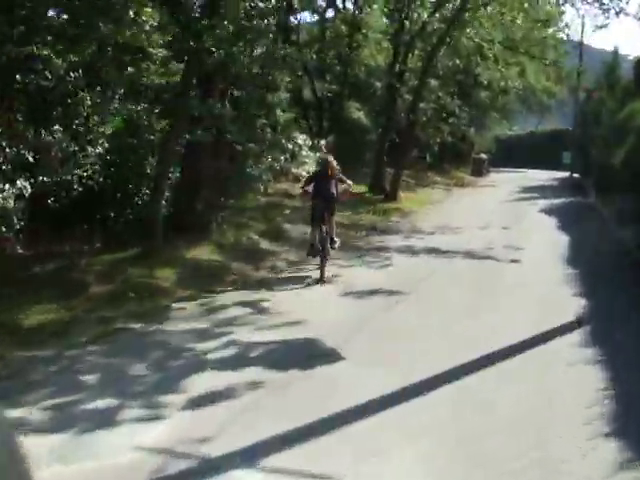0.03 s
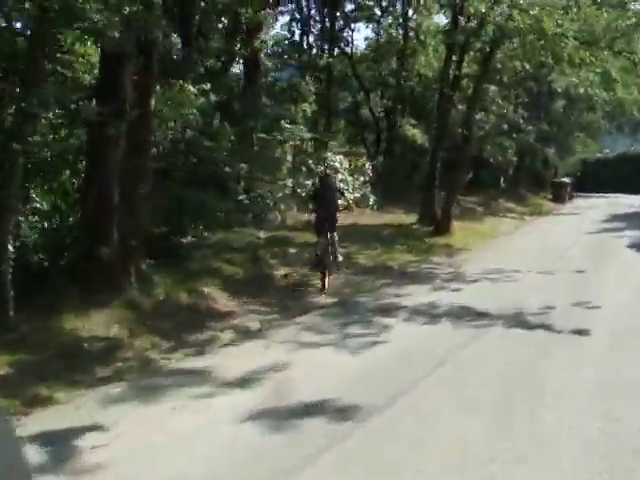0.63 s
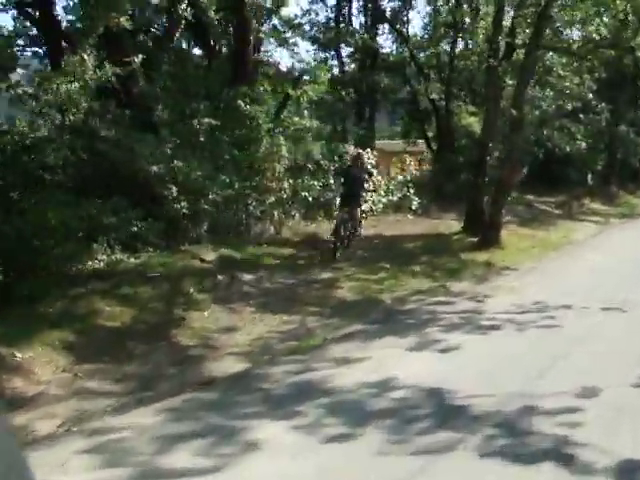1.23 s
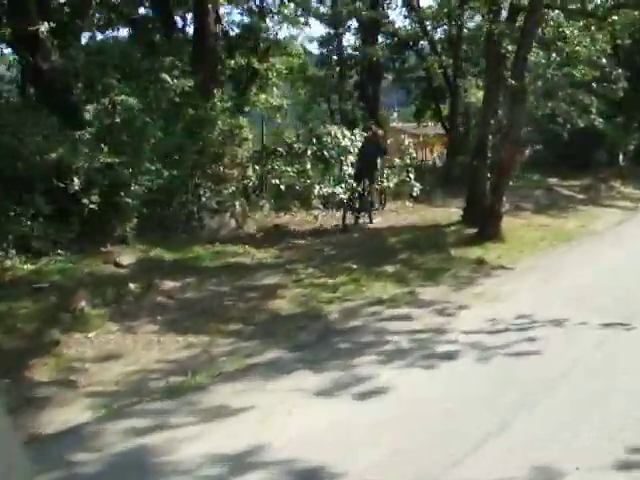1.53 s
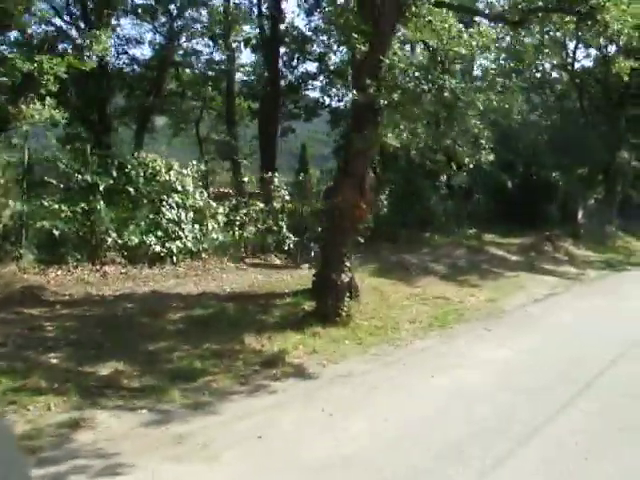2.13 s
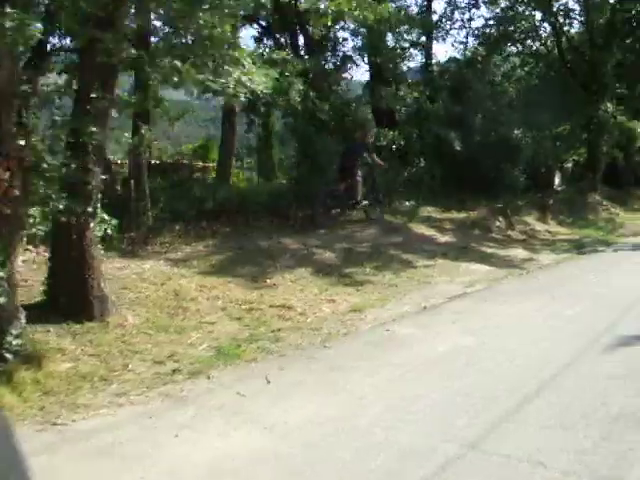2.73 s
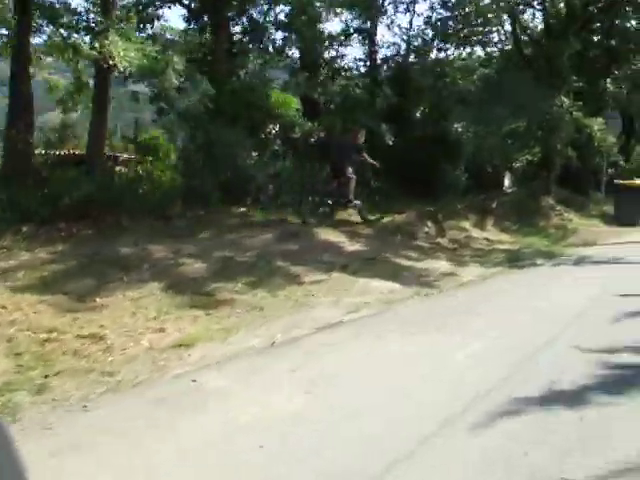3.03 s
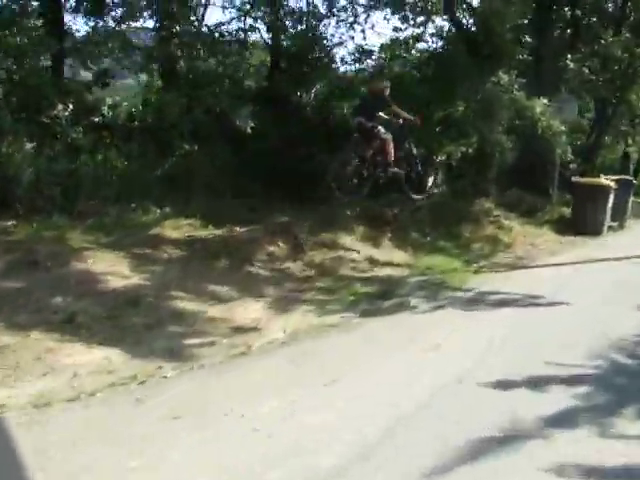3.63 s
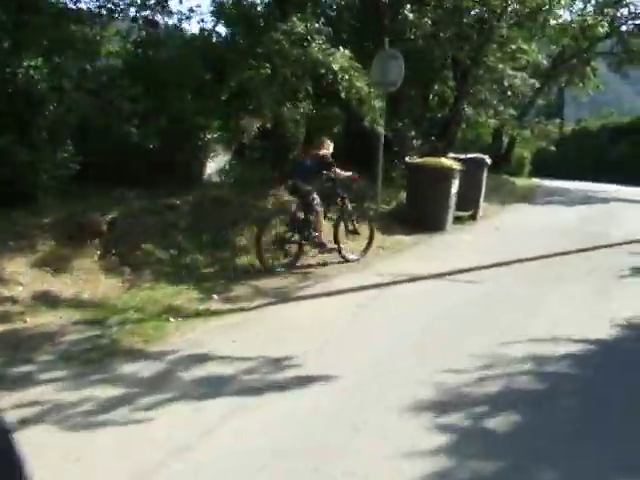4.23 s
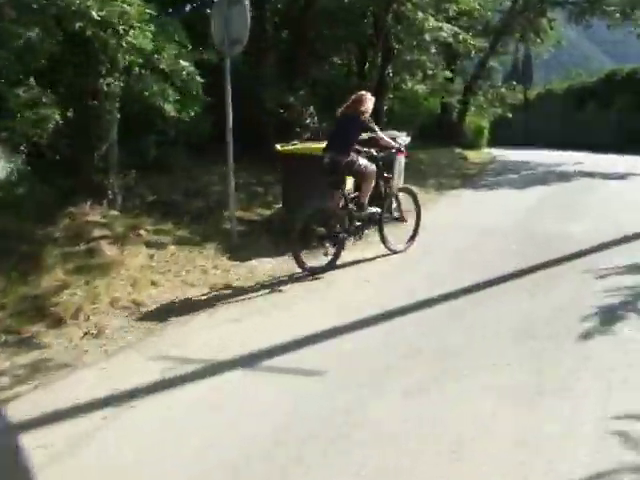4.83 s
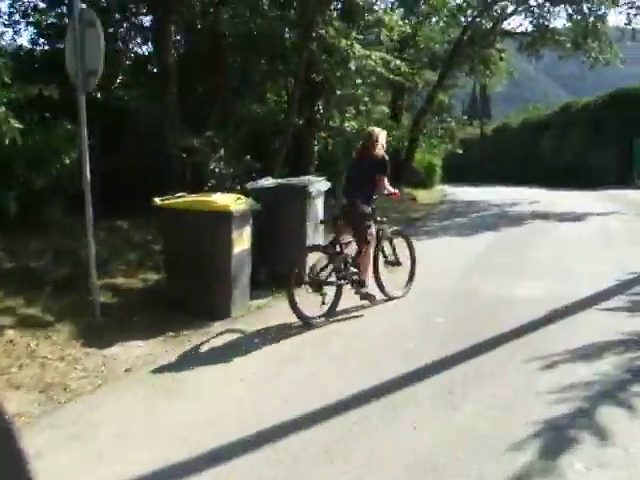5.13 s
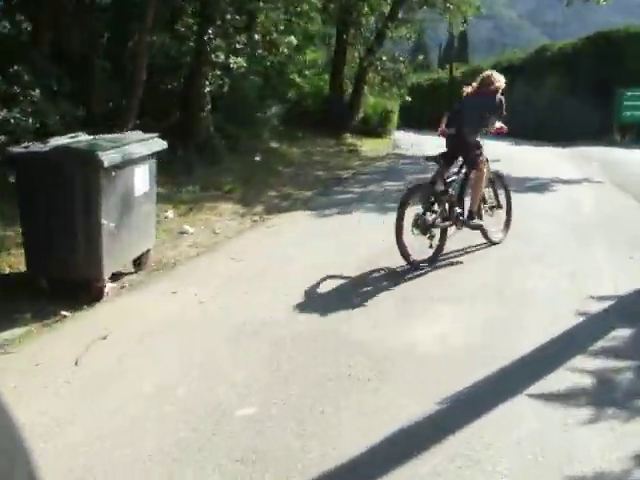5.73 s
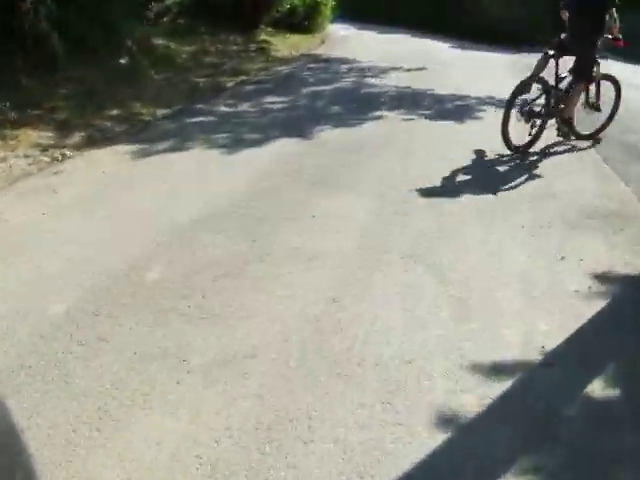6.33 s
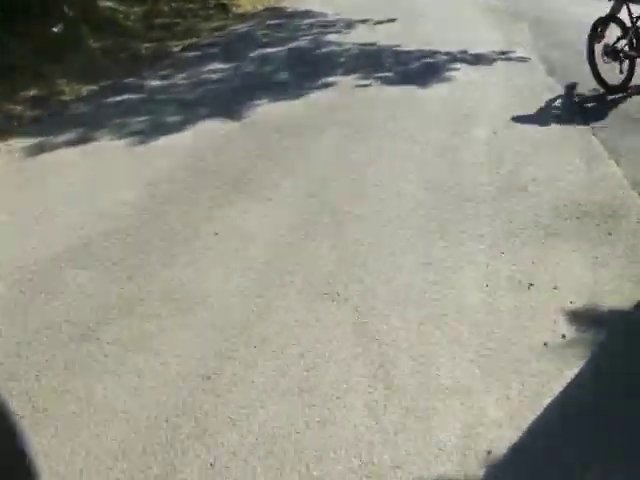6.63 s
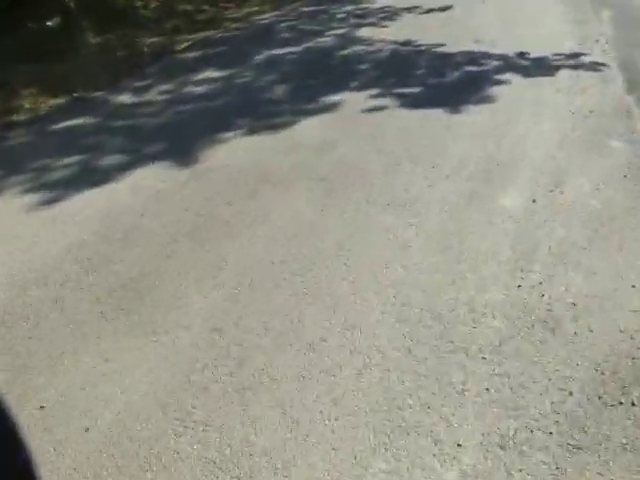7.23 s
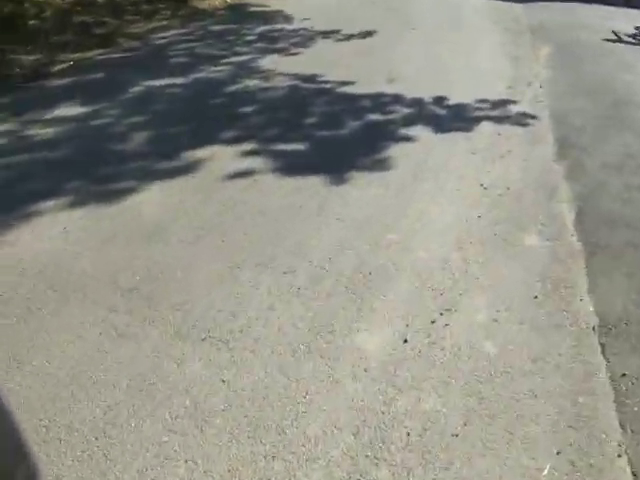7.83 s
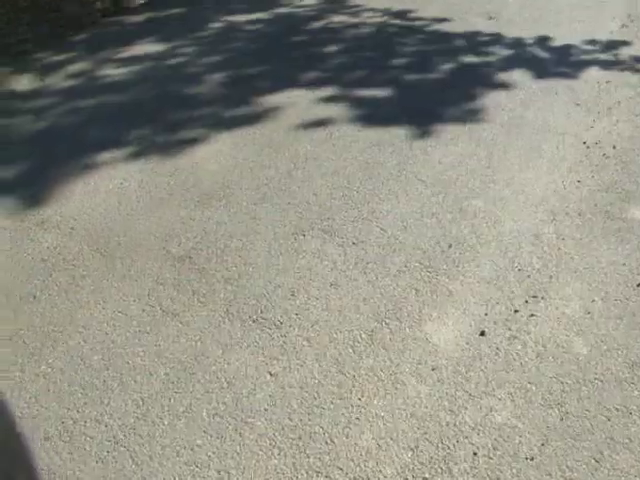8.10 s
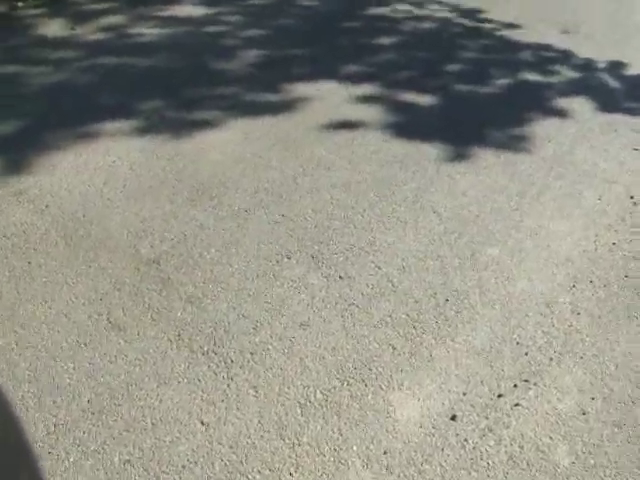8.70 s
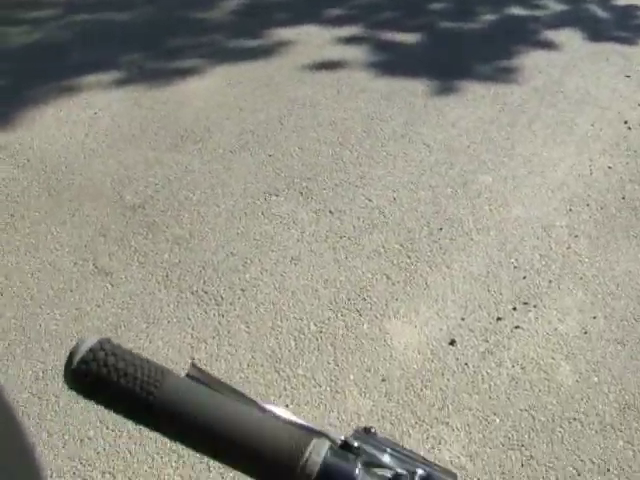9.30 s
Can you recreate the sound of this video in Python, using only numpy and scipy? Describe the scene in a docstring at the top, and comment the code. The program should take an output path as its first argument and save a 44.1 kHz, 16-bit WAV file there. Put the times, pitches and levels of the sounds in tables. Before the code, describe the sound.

Close wind buffets a microphone on a moving bicycle from the start, a loud, uneven low rumble with gusts and short slaps. Faint crunches of dry grass come from a bike ahead at about 0.5 seconds, and a small knock just after 1 second. The wind is strongest from about 2 to 4.6 seconds. Around 4 seconds the other bike lands a jump with a brief crunch and a rattle of sharp clicks. The wind eases, gives a few last puffs near 6 seconds and has died away by 6.6, leaving a quiet, steady hiss of road and foliage with faint grit under the tyres. A dull knock and light rattles come near 8 seconds. From about 8.5 to 9 seconds a braked tyre scrapes over grit, with sharp clicks and a spray of sand. Two sharp ticks follow at about 9.2 and 9.4 seconds.

```python
"""Following a bike past a dirt bank

Roadside, with the microphone on a bicycle behind a second rider who jumps a dirt bank.
Close up, wind buffets the microphone and dies away as the bike slows, leaving a steady hiss of
road and foliage. Ahead, the other bike lands in dry grass and leaves with a crunch and a rattle.
Later a braked tyre scrapes over grit, and two sharp ticks follow."""
import sys
import numpy as np
from scipy import signal
from scipy.fft import rfft, irfft
from scipy.io import wavfile
from scipy.ndimage import uniform_filter1d

SR = 44100
rng = np.random.default_rng(int(sys.argv[2]) if len(sys.argv) > 2 else 0)


def generate_wav(signal):
    """Clip the signal to [-1, 1] and save it as 16-bit WAV at the path in sys.argv[1]."""
    frames = np.transpose(np.atleast_2d(signal))
    scaled = np.clip(frames, -1, 1) * 32767
    pcm = np.round(scaled).astype(np.int16)
    wavfile.write(sys.argv[1], SR, pcm)


N = 417186

# Airflow on the microphone, dying away as the bike slows: time_s, rumble_db, eddy_db
AIRFLOW = [(0, -22, -35.5), (.4, -20.5, -30.5), (1.05, -18, -29), (1.55, -17, -30), (2.3, -17, -24.5),
           (2.9, -16.5, -27.5), (3.6, -19, -32.5), (4.05, -21, -33), (4.35, -19.5, -30),
           (4.92, -26.5, -38.5), (5.15, -23, -34), (5.55, -25.5, -32), (6.2, -33, -47.5), (6.6, -44, -50.5),
           (7.35, -51.5, -56), (7.9, -47.5, -52.5), (8.38, -56.5, -54), (9.46, -58.5, -54)]
# Lulls and puffs in that airflow: middle_s, length_s, rumble_change_db, eddy_change_db
LULLS_AND_PUFFS = [(0.204, 0.12, -7.5, -7.5), (.3, 0.11, -3, 4), (0.724, .05, -1.5, -8),
                   (0.927, 0.12, -0.5, 4.5), (1.06, 0.16, 1.5, 2.5), (1.16, 0.045, -5.5, -6),
                   (2.177, .09, -1, 4), (2.724, 0.063, -1.5, -9), (2.901, 0.045, -2, -8),
                   (3.099, 0.049, -3, -10), (3.177, 0.044, -8, -6), (3.915, 0.074, 2.5, 5),
                   (3.96, .05, 1, -11), (4.467, 0.06, -4.5, -12), (4.538, .04, -2, -7),
                   (4.6, .09, 0.5, 7.5), (4.832, .1, -4, 0), (5.342, 0.093, -5, -9),
                   (5.768, .11, -5.5, -10), (5.847, .07, 5, 4.5), (5.987, 0.095, -11, -8),
                   (6.074, .08, 8.5, 8.5), (6.85, .16, 5, 6), (7.743, 0.37, 5.5, 2), (8.747, 0.39, 13, 2)]
# The largest eddies passing the microphone: middle_s, length_s, level_db
SURGES = [(.29, 0.12, -22), (.6, 0.089, -23), (.93, 0.1, -21.5), (2.47, .07, -24), (2.71, 0.079, -22),
          (2.93, .12, -25), (3.18, 0.12, -19), (3.36, 0.15, -16), (4.34, 0.33, -18.5), (4.53, 0.21, -17.5),
          (5.64, 0.13, -20), (6.03, 0.13, -32), (8.62, .14, -46), (8.82, .12, -46)]
# Wind spectra, from the largest eddies to the smallest: frequency_hz, density_db
SWAY_SPECTRUM = [(12, -20.5), (22, -6), (45, -2.5), (75, -3.5), (110, -15.5), (200, -27.5)]
RUMBLE_SPECTRUM = [(55, -7.5), (90, 2.5), (135, 2.5), (190, -1), (260, -4), (340, -9.5), (480, -16.5),
                   (700, -25.5)]
EDDY_SPECTRUM = [(100, -24.5), (220, -5), (400, -2.5), (700, -7), (1100, -13.5), (1700, -24), (2600, -36.5),
                 (4500, -47)]
FIZZ_SPECTRUM = [(600, -16), (1200, -0.5), (1650, -3), (2200, -7), (3200, -17.5), (5000, -21),
                 (8000, -27.5)]

# Background hiss of road and foliage: frequency_hz, density_db
HISS_SPECTRUM = [(160, -36.5), (280, -5.5), (328, -5), (368, 0), (418, -5.5), (634, -9), (797, -1.5),
                 (1020, -8), (1260, -6), (1730, -7.5), (2400, -5.5), (3490, -11.5), (5840, -7),
                 (7350, -10.5), (8600, -18), (11200, -49.5), (18900, -120)]
# Set curve for the hiss, ducked as by a recorder's gain control in loud wind: time_s, level_db
HISS_LEVEL = [(0, -46.5), (1.6, -47), (2.2, -53), (4.45, -51.5), (5.0, -47), (6.1, -43.5), (7.3, -43),
              (9.46, -44.5)]
# Grit under a rolling or sliding tyre: frequency_hz, density_db
GRIT_SPECTRUM = [(130, -68.5), (220, -35.5), (275, -17.5), (317, -19), (401, -12), (446, -24), (528, -17),
                 (586, -34.5), (668, -21.5), (1140, -12), (1460, -17), (2110, -5), (2890, -8.5),
                 (3470, -17), (5000, -20.5), (6500, -52), (11000, -120)]
# Patches of loose grit on the road: middle_s, length_s, level_db
GRIT_PATCHES = [(.5, 1.1, -52.5), (.58, 0.23, -51), (.86, .06, -42), (1.5, 1.5, -55.5), (4.07, 0.088, -38),
                (5.56, 0.38, -49), (5.9, 0.36, -54), (6.38, .4, -50.5), (6.62, .1, -44), (8.02, 0.38, -56)]

# Short low thumps, wind slaps on the microphone and a dull knock near 8 s:
# middle_s, strength_db, half_length_s, upper_corner_hz
THUMPS = [(0.038, -22, 0.005, 1240), (0.054, -14.5, 0.0058, 1090), (0.443, -21, 0.004, 980),
          (1.193, -24, 0.0046, 900), (2.433, -18.5, .012, 2070), (2.549, -20, 0.0056, 1590),
          (2.789, -24.5, .014, 1800), (3.068, -22, 0.0047, 1910), (3.131, -21.5, 0.0065, 2190),
          (3.304, -25.5, 0.018, 1430), (3.602, -20.5, 0.0072, 1510), (4.423, -31, 0.00505, 1200),
          (4.501, -24, 0.0051, 1000), (4.571, -21, 0.0055, 1100), (4.649, -22.5, 0.0056, 1100),
          (5.164, -22, 0.00585, 1130), (5.478, -24.5, 0.0047, 1080), (5.644, -23, 0.0072, 1000),
          (5.945, -18, .01, 450), (6.077, -22.5, 0.026, 400), (7.24, -31, 0.019, 290),
          (7.975, -33, 0.0072, 1100), (8.04, -40, .04, 1000), (8.234, -33.5, .014, 420)]

# The bike ahead crushing the verge, hardest on landing: peak_s, level_db, rise_s, fade_db_per_s
CRUNCHES = [(.42, -43.5, .06, 200), (.53, -40.5, 0.023, 203), (.605, -40.5, 0.014, 110),
            (.69, -50, .015, 252), (.87, -47, .04, 151), (3.3, -47.5, .05, 130), (3.55, -50.5, .03, 98),
            (4.05, -36, 0.047, 85), (4.122, -38, 0.06, 102)]
# Dry grass and leaves snapping: frequency_hz, density_db
LEAF_SPECTRUM = [(1000, -20.5), (1700, -5), (2400, 3), (3300, -11), (4100, -3), (4900, -3.5), (6000, -3.5),
                 (7100, -1), (8000, -8.5), (9000, -17.5)]

# Knocks of stones, chain and brake parts: start_s, level_db, pitch_hz, ring_s
KNOCKS = [(0.6, -25, 6960, .012), (0.734, -25, 7500, .012), (1.12, -17, 1930, 0.06),
          (3.537, -29.5, 6900, 0.014), (4.012, -30, 2300, 0.036), (4.03, -28, 7300, .008),
          (4.052, -28, 7400, .011), (4.08, -19, 2100, 0.069), (4.093, -13, 6740, 0.011),
          (4.119, -8, 7060, 0.01), (4.122, -23, 2160, 0.033), (5.236, -24, 2190, 0.018),
          (6.444, -28, 3000, .01), (7.9, -30, 2200, .015), (8.012, -33, 2400, .02),
          (8.050, -30, 1690, 0.036), (8.120, -27, 2340, 0.015), (8.424, -21, 2260, .012),
          (8.486, -12, 2640, 0.0074), (8.494, -8, 2380, 0.003), (8.569, -16, 2600, 0.0049),
          (8.617, -8, 2480, .012), (8.632, -8.5, 2180, .007), (8.673, -13.5, 5660, 0.0066),
          (8.895, -12, 2440, .005), (8.919, -14, 2320, .008), (9.2332, -22.5, 3820, 0.0036),
          (9.3686, -17.5, 2370, 0.0035)]

# The braked tyre digging in, and the sand it sprays: frequency_hz, density_db
DIG_SPECTRUM = [(150, -42), (250, -19), (355, -31), (383, -16), (418, -30), (524, -14), (640, -21),
                (708, -3), (1240, -13), (1430, -2.5), (2130, -6), (2330, -2), (2920, -7.5), (3940, -17),
                (5000, -26), (6500, -56), (11000, -120)]
SAND_SPECTRUM = [(2500, -11.5), (4000, -6), (5200, -1), (6300, -0.5), (7500, -6.5), (8800, -16)]


def gain_of(db):
    """Decibels to amplitude."""
    return 10 ** (np.asarray(db) / 20)


def unit_rms(x):
    """Scales to rms 1."""
    return x / np.sqrt(np.mean(x ** 2) + 1e-20)


def level(rows, column=1):
    """Gain at every sample from one dB column of a curve, fading 200 dB/s outside it."""
    rows = np.asarray(rows)
    t = np.arange(N) / SR
    outside_s = np.maximum(rows[0, 0] - t, 0) + np.maximum(t - rows[-1, 0], 0)
    return gain_of(np.interp(t, rows[:, 0], rows[:, column]) - 200 * outside_s)


def coloured(x, spectrum):
    """Filters x by a spectrum that falls 24 dB an octave past its ends; rms 1."""
    hz, db = np.transpose(spectrum)
    octave, knots = np.log2(np.fft.rfftfreq(N, 1 / SR) + 1), np.log2(hz)
    outside = np.maximum(knots[0] - octave, 0) + np.maximum(octave - knots[-1], 0)
    shape = gain_of(np.interp(octave, knots, db) - 24 * outside)
    return unit_rms(irfft(rfft(x) * shape, N))


def white():
    """White noise."""
    return rng.standard_normal(N)


def wander(slow_hz, fast_hz):
    """Random drift between two rates, rms 1."""
    hz = np.fft.rfftfreq(N, 1 / SR)
    shape = (hz > slow_hz) / np.sqrt(hz + 1) / (1 + (hz / fast_hz) ** 4)
    return unit_rms(irfft(rfft(white()) * shape, N))


def grains(per_s, spread_db):
    """Random tiny impacts, mostly small, a few large."""
    size = gain_of(spread_db * np.minimum(rng.exponential(1, N), 4))
    polarity = np.sign(white())
    struck = rng.random(N) < per_s / SR
    return unit_rms(size * polarity * struck)


def steadied(x, window_s):
    """Evens out the slow swells of a noise, keeping its quick flutter."""
    size = max(int(window_s * SR), 3)
    power = uniform_filter1d(uniform_filter1d(x ** 2, size), size)
    return x / np.sqrt(abs(power) + 1e-9)


def add(mix, start_s, sound):
    """Mixes a sound in at start_s."""
    part = mix[max(round(start_s * SR), 0):][:len(sound)]
    part += sound[:len(part)]


def hump(middle_s, length_s):
    """A half sine: up to 1 and back to 0."""
    out = np.zeros(N)
    arch = np.sin(np.linspace(0, np.pi, int(length_s * SR)))
    add(out, max(middle_s - length_s / 2, 0), arch)
    return out


def swells(rows):
    """Gain of separate swells: middle_s, length_s, level_db."""
    return sum(gain_of(db) * hump(middle_s, length_s) for middle_s, length_s, db in rows)


def stroke(span_s, span_db, rise_db_per_s, fall_db_per_s):
    """Gain that rises, slopes from one level to another across span_s, and falls away."""
    t = np.arange(N) / SR
    start_s, end_s = span_s
    before_db = rise_db_per_s * np.maximum(start_s - t, 0)
    after_db = fall_db_per_s * np.maximum(t - end_s, 0)
    return gain_of(np.interp(t, span_s, span_db) - before_db - after_db)


def wind(full_flow_db=-19.0, sway_db=-24.5, sway_growth=0.72, strong_db=-26.0, fizz_growth=1.3):
    """Air on the microphone: large eddies sway and rumble, fine ones burst on the pressure swings."""
    puffs_db = sum(np.outer(changes_db, hump(middle_s, length_s))
                   for middle_s, length_s, *changes_db in LULLS_AND_PUFFS)
    rumble_puffs, eddy_puffs = gain_of(puffs_db)
    flow = level(AIRFLOW) * rumble_puffs
    flutter = np.tanh(wander(3.9, 17))
    turbulence = 2 * np.tanh(wander(12, 80) / 2)

    sway = steadied(coloured(white(), SWAY_SPECTRUM), window_s=0.16)
    sway = unit_rms(sway * gain_of(0.83 * turbulence))
    between_surges = gain_of(sway_db) * (flow / gain_of(full_flow_db)) ** sway_growth
    sway_gain = np.hypot(between_surges, swells(SURGES))

    rumble = steadied(coloured(white(), RUMBLE_SPECTRUM), window_s=0.046)
    buffet = unit_rms(rumble * gain_of(1.66 * turbulence + 1.5 * flutter))

    bursts = gain_of(3.0 * turbulence + 1.5 * rumble)
    eddies = steadied(coloured(white() * bursts, EDDY_SPECTRUM), window_s=0.064)
    # Fine eddies need a strong flow, so the flow caps their level.
    eddy_gain = np.minimum(level(AIRFLOW, column=2) * eddy_puffs, flow * gain_of(-2))
    eddy_gain *= gain_of(1.66 * flutter)

    # The smallest eddies grow fastest, so strong gusts turn brighter.
    fizz = coloured(white() * bursts, FIZZ_SPECTRUM)
    fizz_gain = gain_of(strong_db - 18) * (eddy_gain / gain_of(strong_db)) ** fizz_growth
    return (sway * sway_gain + gain_of(-1) * buffet * flow
            + gain_of(-0.5) * eddies * eddy_gain + fizz * fizz_gain)


def road(hiss_swing_db=0.65, clump_db=2.0, bare_road_db=-53.5):
    """Road and foliage hiss in the background while grit crackles under the rolling tyres."""
    hiss = coloured(white(), HISS_SPECTRUM) * gain_of(hiss_swing_db * wander(3.3, 30))
    crackle = grains(per_s=1600, spread_db=3.0) * gain_of(clump_db * wander(6, 60))
    grit = coloured(crackle, GRIT_SPECTRUM)
    return hiss * level(HISS_LEVEL) + grit * (gain_of(bare_road_db) + swells(GRIT_PATCHES))


def thumps(low_corner_ratio=0.18):
    """Short bursts of low noise: wind slapping the microphone, and a dull knock near 8 s."""
    out = np.zeros(N)
    for middle_s, db, half_length_s, hz in THUMPS:
        size = int(2 * half_length_s * SR)
        band = signal.butter(3, [hz * low_corner_ratio, hz], "bandpass", fs=SR, output="sos")
        slope = signal.butter(1, hz / 2, fs=SR, output="sos")
        noise = signal.sosfilt(np.vstack([band, slope]), rng.standard_normal(SR // 2))
        thump = unit_rms(noise[-size:] * np.hanning(size))
        add(out, middle_s - half_length_s, gain_of(db) * thump / 2)
    return out


def verge_crunch(clump_db=3.6):
    """Dry stalks and leaves snap in clumps under the bike ahead, hardest as it lands."""
    snaps = grains(per_s=3100, spread_db=2.0) * gain_of(clump_db * wander(17, 120))
    crush, t = np.zeros(N), np.arange(N) / SR
    for peak_s, db, rise_s, fade_db_per_s in CRUNCHES:
        onset = np.clip(1 + (t - peak_s) / rise_s, 0, 1)
        crush += onset * gain_of(db - fade_db_per_s * np.maximum(t - peak_s, 0))
    return coloured(snaps, LEAF_SPECTRUM) * crush


def knocks(rattle_db=-12.5, tail_db=-27.0, tail_t60_s=0.31, half_band=0.26):
    """Stones, chain and brake parts knock: a damped ring, a brief rattle, a faint scattered tail."""
    out, t = np.zeros(N), np.arange(SR // 5) / SR
    for start_s, db, pitch_hz, ring_s in KNOCKS:
        edges_hz = [pitch_hz * (1 - half_band), pitch_hz * (1 + half_band)]
        band = signal.butter(3, edges_hz, "bandpass", fs=SR, output="sos")
        crack = signal.sosfilt(band, signal.unit_impulse(len(t)))
        scatter = unit_rms(signal.sosfilt(band, rng.standard_normal(len(t))))
        rattle = gain_of(rattle_db - 30 * t / ring_s)
        tail = gain_of(tail_db - 60 * t / tail_t60_s)
        add(out, start_s, gain_of(db) * (crack / abs(crack).max() + scatter * (rattle + tail)))
    return out


def skid(clump_db=1.5, bite_db=5.5):
    """Stones catch and slip under the locked tyre: it digs in, then slides on, spraying sand."""
    slips = grains(per_s=5000, spread_db=0.5) * gain_of(clump_db * wander(20, 200))
    dig = steadied(coloured(slips, DIG_SPECTRUM), window_s=0.069)
    dig *= stroke(span_s=(8.485, 8.625), span_db=(-30.5, -22.5), rise_db_per_s=350, fall_db_per_s=62)

    slide = steadied(coloured(np.roll(slips, SR), GRIT_SPECTRUM), window_s=0.082)
    slide *= stroke(span_s=(8.73, 8.985), span_db=(-30.5, -28), rise_db_per_s=100, fall_db_per_s=240)
    slide *= gain_of(bite_db * hump(middle_s=8.925, length_s=0.034))  # one last bite before it stops

    sand = coloured(grains(per_s=4900, spread_db=1.5), SAND_SPECTRUM)
    sand *= stroke(span_s=(8.59, 8.99), span_db=(-41, -42.5), rise_db_per_s=110, fall_db_per_s=110)
    return dig + slide + sand


def scene():
    """All sources at the one microphone on the following bike."""
    return (wind() + thumps() + road() + verge_crunch() + skid() + knocks())[None]


def record(dry, ceiling=0.38, rolloff_hz=8100, band_limit_hz=8750):
    """The microphone input rounds off the largest swings, rolls off the treble and limits the band."""
    rounded = dry / (1 + (dry / ceiling) ** 4) ** (1 / 4)
    dulled = signal.sosfilt(signal.butter(12, rolloff_hz, fs=SR, output="sos"), rounded)
    band_limit = signal.firwin(161, band_limit_hz, window=("kaiser", 8), fs=SR)
    return signal.oaconvolve(dulled, band_limit[None], "same")


dry = scene()
out = record(dry)
generate_wav(out)
```